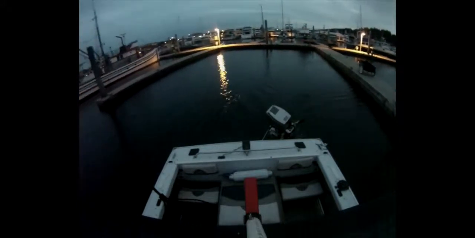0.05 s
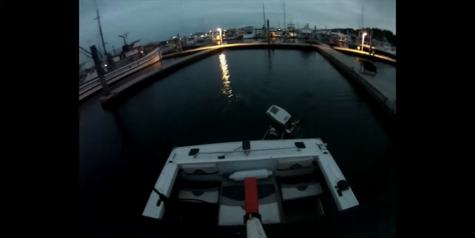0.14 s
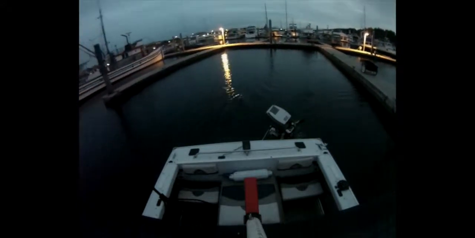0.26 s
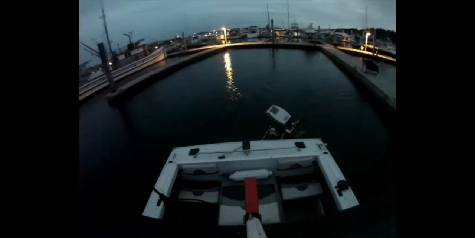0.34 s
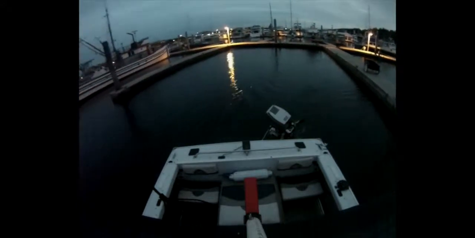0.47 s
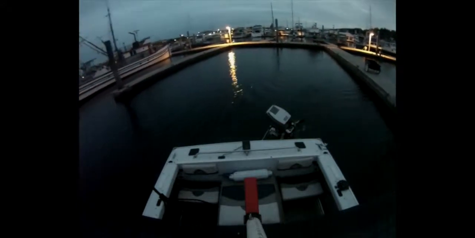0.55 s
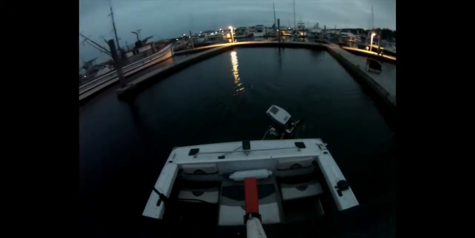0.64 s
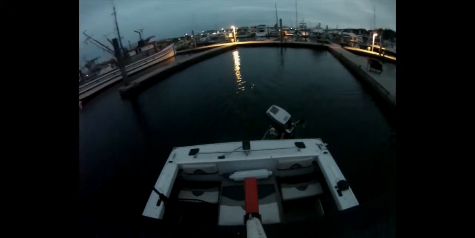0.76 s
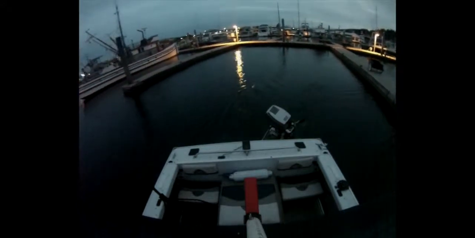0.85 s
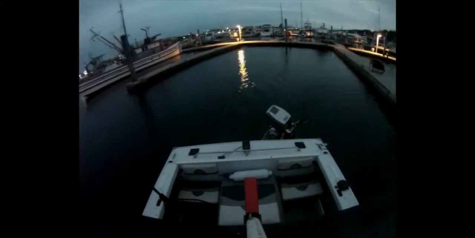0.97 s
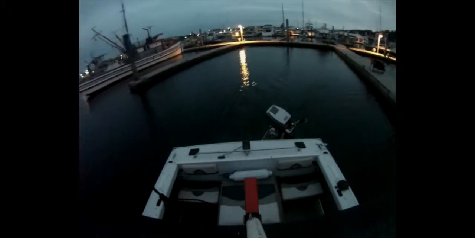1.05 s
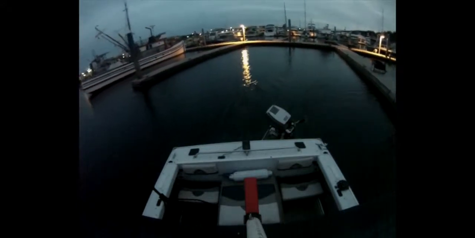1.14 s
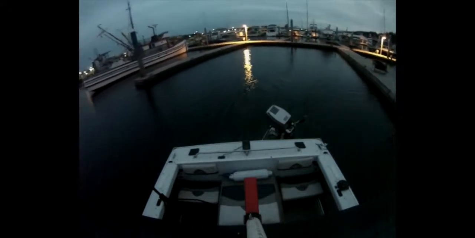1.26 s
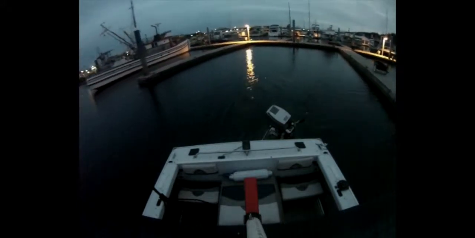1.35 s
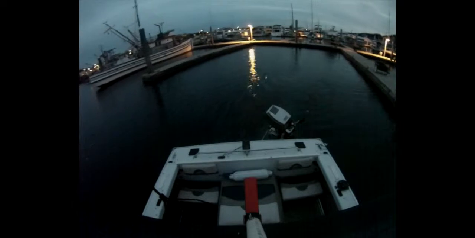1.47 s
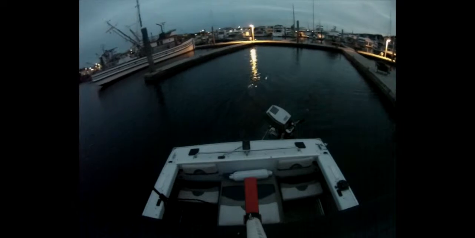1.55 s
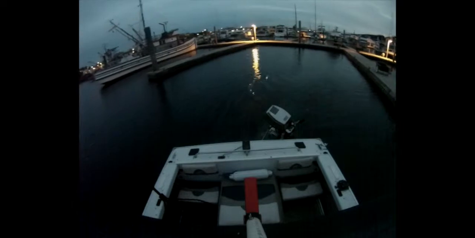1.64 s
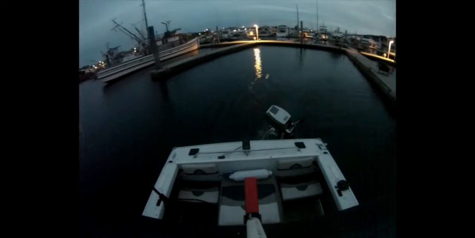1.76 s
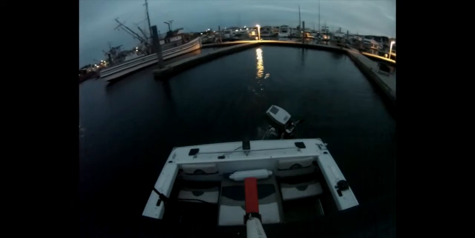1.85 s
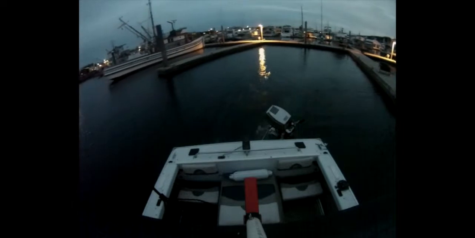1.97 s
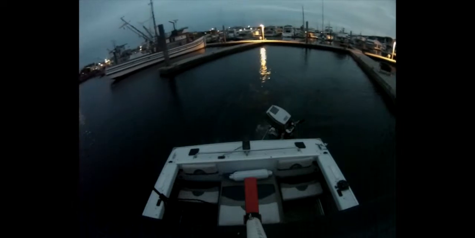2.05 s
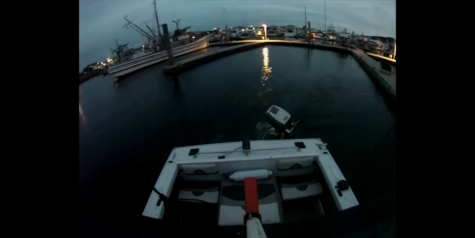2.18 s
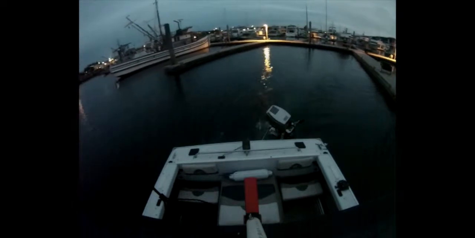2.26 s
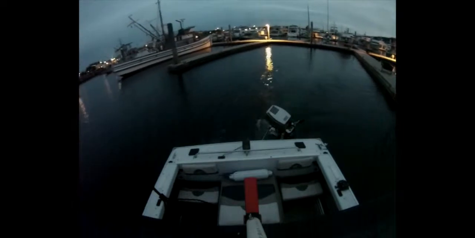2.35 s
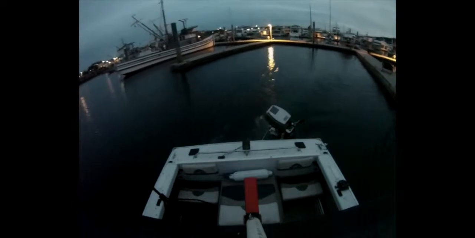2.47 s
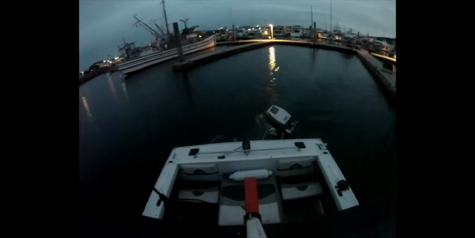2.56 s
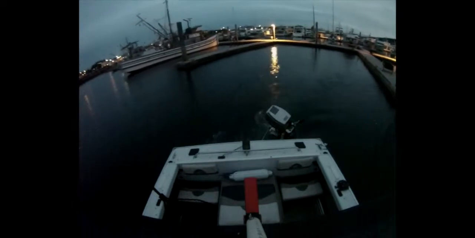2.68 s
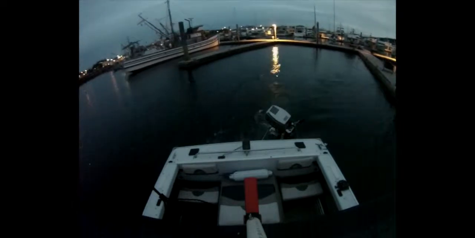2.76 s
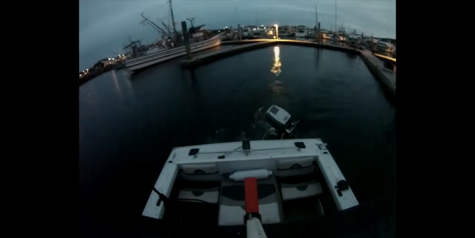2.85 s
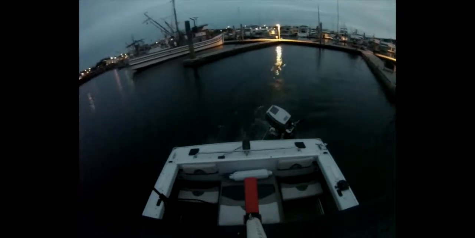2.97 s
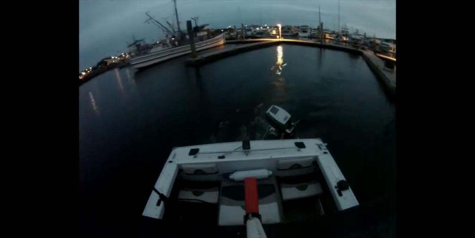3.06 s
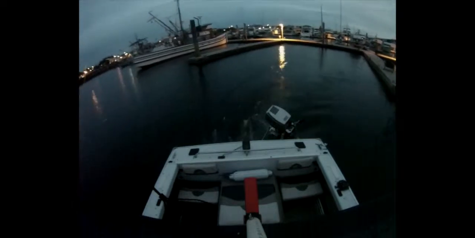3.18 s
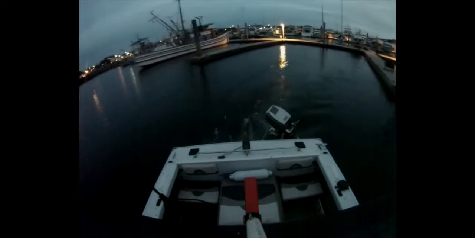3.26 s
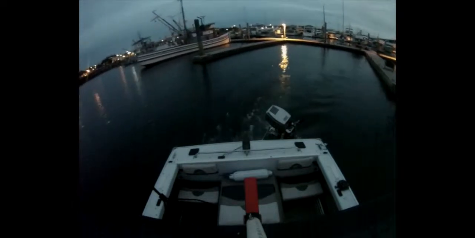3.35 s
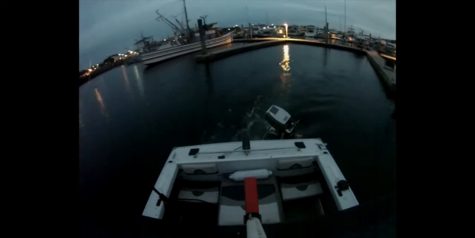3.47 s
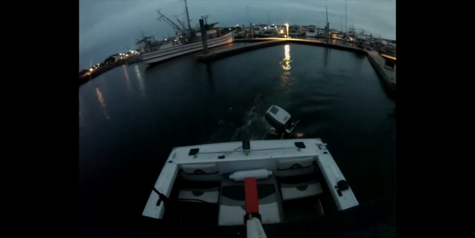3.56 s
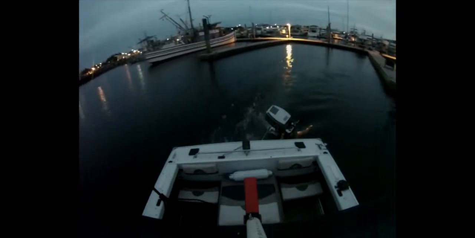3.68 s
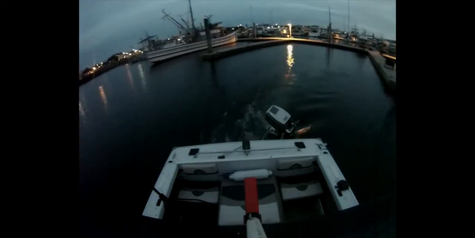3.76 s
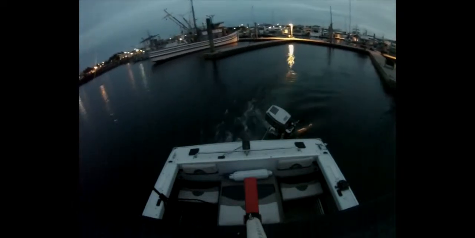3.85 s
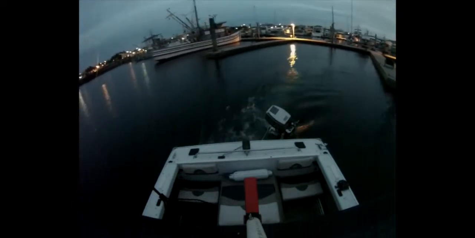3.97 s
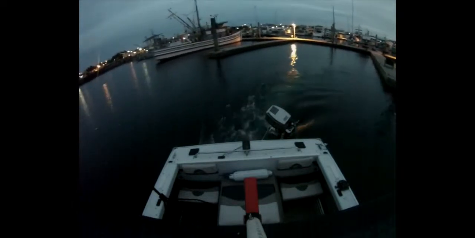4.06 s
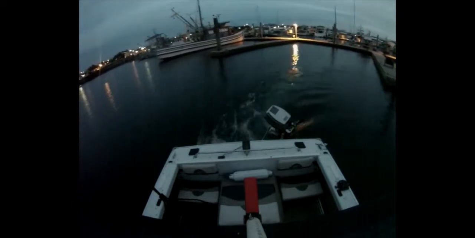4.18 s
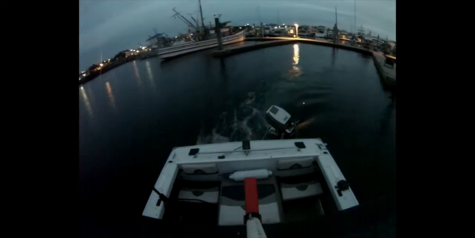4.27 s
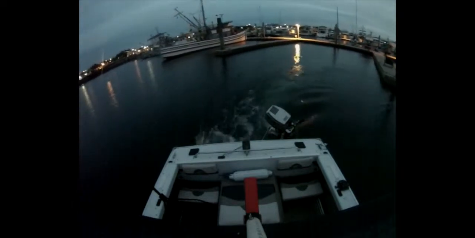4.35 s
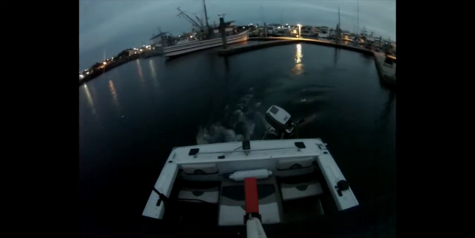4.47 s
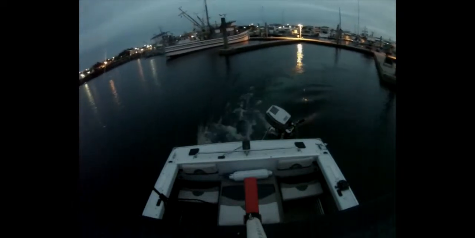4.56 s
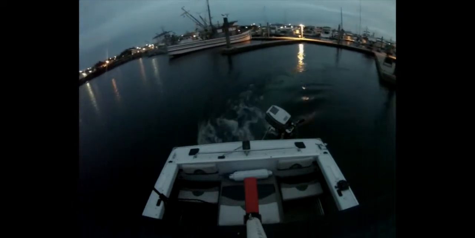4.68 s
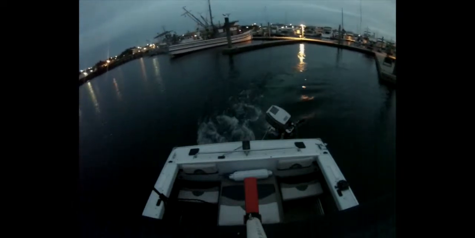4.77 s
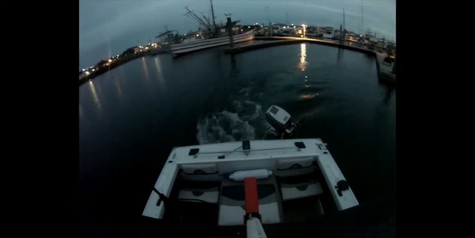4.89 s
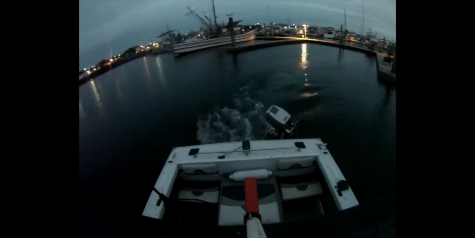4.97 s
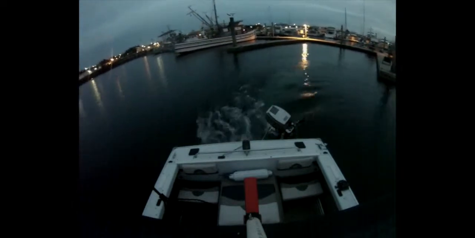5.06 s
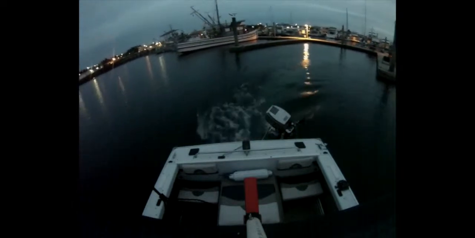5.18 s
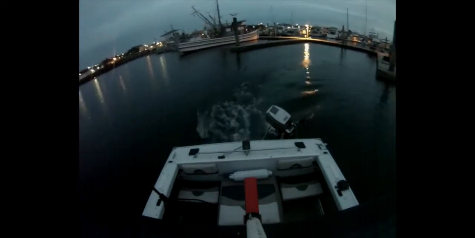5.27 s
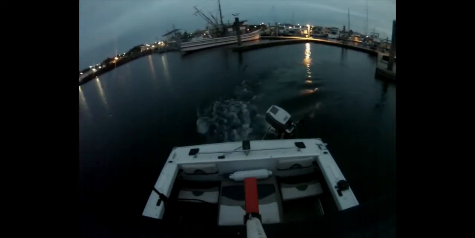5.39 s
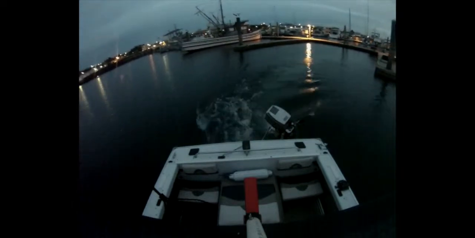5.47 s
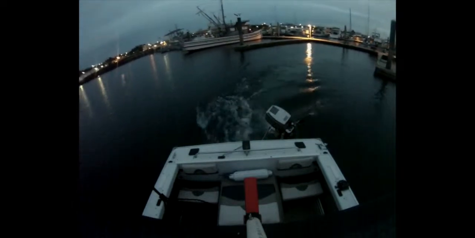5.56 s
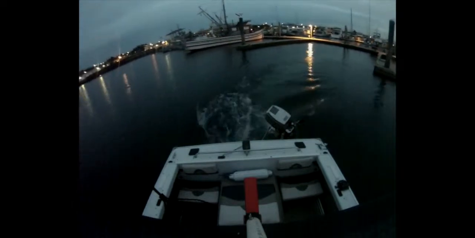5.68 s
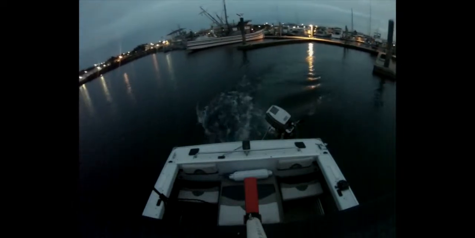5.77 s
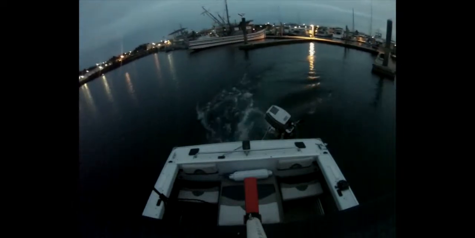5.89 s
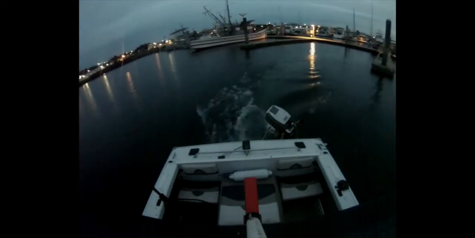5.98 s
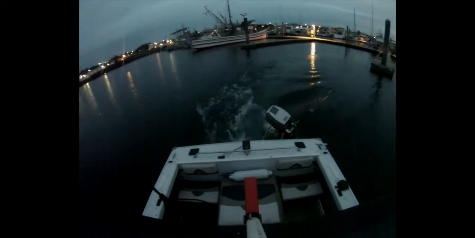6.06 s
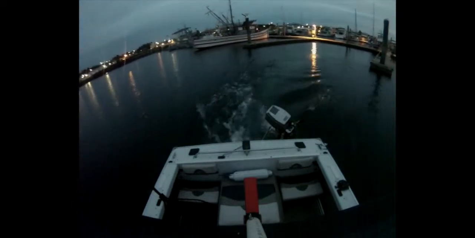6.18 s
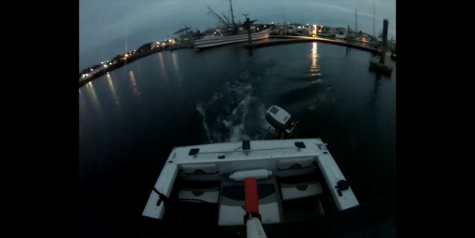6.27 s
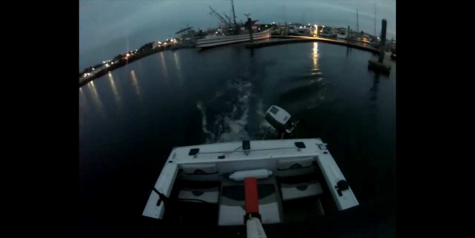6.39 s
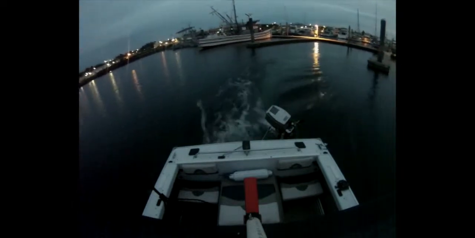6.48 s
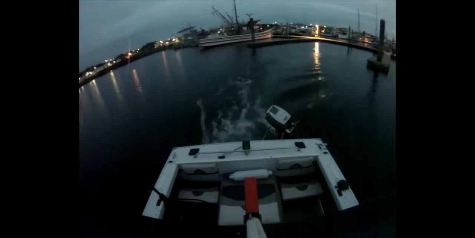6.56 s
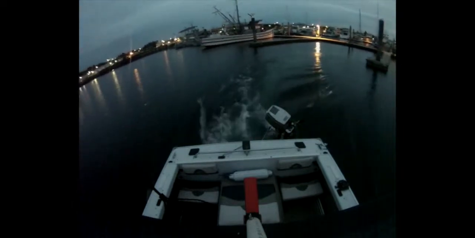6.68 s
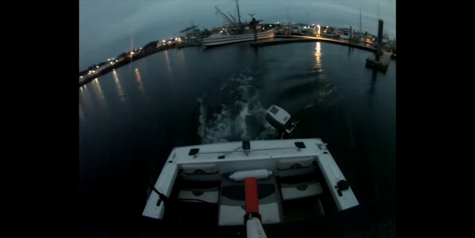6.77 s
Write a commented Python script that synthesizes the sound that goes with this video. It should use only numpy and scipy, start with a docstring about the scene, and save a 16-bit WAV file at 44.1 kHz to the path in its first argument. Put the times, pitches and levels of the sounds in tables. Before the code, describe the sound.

On board a small boat leaving a calm harbour, close to the stern motor: low burbling tick-over first, then a quick rise in revs with a brief stumble and bark, a throbbing low drone under a faint beating whine, and a second, gentler step up. Churning, bubbly water gradually replaces the engine's hiss, dotted with small drips and dry flecks of spray.

```python
"""A small outboard motor, heard from on board, ticks over and is then opened up in two steps, near 1.9 s and 4.6 s.
At tick-over the underwater exhaust drones, gulps and burbles while the engine hisses; the drone is summed sines.
As the throttle opens the drone stumbles, the gears' beating sines climb in whine and the cowl's noise clatters more.
As the boat gathers way, shaped noise and tiny rings make a fizzing wash, with splashes and flecks of spray."""
import sys
import numpy as np
from scipy import signal
from scipy.fft import rfft, irfft, next_fast_len
from scipy.io import wavfile
from scipy.ndimage import uniform_filter1d, map_coordinates

SR = 44100
rng = np.random.default_rng(int(sys.argv[2]) if len(sys.argv) > 2 else 0)


def wav_record(signal):
    """Record a signal, one row per channel, as 16-bit PCM in the file named by sys.argv[1]."""
    frames = np.transpose(np.atleast_2d(signal))
    bounded = np.clip(frames, -1, 1)
    # unit amplitude maps onto the largest positive 16-bit level
    quanta = np.round(bounded * 32767).astype(np.int16)
    wavfile.write(sys.argv[1], SR, quanta)


N = 301203

CAVITY_HZ = 80  # the exhaust cavity's own note

# Resonances of exhaust cavity and hull, met by the climbing low tones. Each row: frequency in Hz, level in dB.
HULL_RESONANCES = [(40, -31.5), (46, -28), (51.5, -21), (55.7, -17), (57.5, -20), (61, -33.5), (78, -18.5),
                   (82, -21.5), (90, -28), (104, -43.5), (110.5, -42), (113, -27.5), (122, -30), (155, -32),
                   (163, -31.5), (170, -34.5)]


def amp(db):
    """Decibels to gain."""
    return 10 ** (np.asarray(db) / 20)


def unit(x):
    """Scaled to rms 1."""
    return x / np.sqrt(np.mean(x ** 2) + 1e-20)


def wobble(knots_per_s):
    """A smooth random curve through normally distributed knots."""
    knots = rng.standard_normal(int(N * knots_per_s / SR) + 4)
    return map_coordinates(knots, [np.arange(N) * knots_per_s / SR])


def along(points, hz):
    """(Hz, value) points read on a log frequency axis."""
    f, v = np.transpose(points)
    return np.interp(np.log(hz), np.log(f), v)


def swells(rows):
    """Decibels over time: one smooth hump or dip a row of (s, half length s, dB)."""
    t = np.arange(N) / SR
    return sum(db * np.exp(-((t - s) / half_s) ** 2) for s, half_s, db in rows)


def filtered(x, response):
    """x times a response of frequency."""
    m = next_fast_len(N + SR // 2)
    return irfft(rfft(x, m) * response(np.fft.rfftfreq(m, 1 / SR)), m)[:N]


def coloured(x, spectrum):
    """x shaped by (Hz, dB per Hz) points, at rms 1."""
    f, db = np.transpose(spectrum)

    def gain(hz):
        return amp(np.interp(np.log(hz + 1), np.log(f + 1), db, left=-120, right=-120))
    return unit(filtered(x, gain))


def puffs(phase, depth):
    """White noise that swells once a firing."""
    return rng.standard_normal(N) * (1 + depth * np.cos(phase))


def engine_rate():
    """Firings a second: the speed creeps upward and follows each twist of the throttle with a lag."""
    # Twists of the throttle. Each row: start in seconds, firings a second gained, engine's lag in seconds.
    throttle_twists = [(1.89, 10.43, .251), (4.636, 3.4, .288)]
    idle_hz, creep_hz_per_s = 40.06, .454
    twist_s = .18  # the hand takes a moment to turn the grip
    t = np.arange(N) / SR
    gained_hz = sum(hz * (1 - np.exp(-np.maximum(t - s, 0) / lag_s)) for s, hz, lag_s in throttle_twists)
    return idle_hz + creep_hz_per_s * t + uniform_filter1d(gained_hz, int(twist_s * SR))


def exhaust(phase, rate, load, octave_level_db, unsteady_db):
    """Each firing sounds under water as a tone and its octave; bubbles unsettle the drone most at tick-over."""
    # The octave drops out briefly, mostly at tick-over. Each row: centre and half length in seconds, level in dB.
    dropouts = [(0, .08, -14), (.31, .03, -6), (.44, .07, -6), (.69, .045, -18), (.93, .08, -8.5),
                (1.14, .03, -6), (1.47, .04, -8), (2.03, .065, -3)]
    # The firing tone stumbles and catches as the throttle opens, then eases.
    # Each row: centre and half length in seconds, level in dB.
    stumbles = [(2.01, 0.031, -5), (2.08, 0.025, 5), (2.16, 0.083, -3), (3.45, .35, -0.95)]
    settle_db, settle_s = 4.5, .33  # the firing tone starts stronger and settles
    settling = settle_db * np.exp(-np.arange(N) / SR / settle_s)
    slack = 1 - load

    tone_db = along(HULL_RESONANCES, rate) + settling + swells(stumbles)
    tone_db = tone_db + (.4 + unsteady_db * slack) * wobble(22)
    tone = amp(tone_db) * np.sin(phase + .03 * wobble(15))

    octave_db = along(HULL_RESONANCES, 2 * rate) + octave_level_db + swells(dropouts)
    octave_db = octave_db + (.5 + .7 * slack) * wobble(16)
    lag_rad = np.clip(.7 * (2 * rate - CAVITY_HZ), 0, 4.4)  # grows as the octave crosses the cavity's note
    octave = amp(octave_db) * np.sin(2 * phase - lag_rad + (.06 + .18 * slack) * wobble(12))
    return -np.sqrt(2) * (tone + octave)


def boom(phase, rate, load, low_db, high_db, flutter_db, ragged_db):
    """The cavity booms at 1.5 times the firing rate; the octave of that is more ragged and trails under load."""
    # The exhaust cavity booms or falls quiet. Each row: centre and half length in seconds, level in dB.
    boom_swells = [(2.53, .13, 8), (2.89, .12, 7), (3.78, .08, -7), (3.97, .09, 9), (4.17, .13, 9.5),
                   (4.48, .08, 5)]
    # The drone's third harmonic throbs. Each row: centre and half length in seconds, level in dB.
    throbs = [(2.82, .05, 11), (3.14, .045, 8.5), (3.63, .06, 6), (3.83, .05, 11), (4.15, .15, 4.5)]
    low_db = along(HULL_RESONANCES, 1.5 * rate) + low_db + swells(boom_swells) + flutter_db * wobble(12)
    low = amp(low_db) * np.sin(1.5 * phase + .3 * wobble(6.8))

    high_db = along(HULL_RESONANCES, 3 * rate) + high_db + 2.5 * (1 - load) + swells(throbs)
    high_db = high_db + ragged_db * wobble(14)
    lag_rad = 1.2 + 4 * load
    high = amp(high_db) * np.sin(3 * phase - lag_rad + .3 * wobble(12))
    return -np.sqrt(2) * (low + high)


def barks():
    """A surge of gas rings the exhaust cavity at its own note."""
    # Surges, mostly as the throttle opens. Each row: centre and half length in seconds, level in dB.
    surges = [(2.1, .04, -33), (2.235, .04, -25.5), (5.96, .05, -30)]
    t = np.arange(N) / SR
    size = sum(amp(db) * np.exp(-((t - s) / half_s) ** 2) for s, half_s, db in surges)
    return np.sqrt(2) * size * np.sin(2 * np.pi * CAVITY_HZ * t + .2 * wobble(12))


def overtones(phase, load, level_db, flutter_db):
    """Firings that differ in a pattern of four, and moving parts, add a lope and faint lines around the drone."""
    # Weaker tones. Each row: multiple of the firing rate, level in dB at tick-over, level in dB under way.
    faint_tones = [(.25, -53, -55), (.5, -60, -45), (.75, -51, -43), (1.25, -52, -43), (1.75, -66, -50),
                   (2.25, -60, -56), (2.75, -60, -56), (4, -65, -69), (5, -76, -69), (6, -69, -78),
                   (7, -78, -73), (10, -80, -65), (11, -78, -71), (11.7, -78, -65), (12, -78, -67),
                   (14.5, -82, -67)]
    lines = np.zeros(N)
    for multiple, slow_db, fast_db in faint_tones:
        line_db = slow_db + load * (fast_db - slow_db) + flutter_db * wobble(7.6)
        start_rad = rng.uniform(0, 2 * np.pi)
        lines += amp(line_db) * np.cos(multiple * phase + start_rad + .55 * wobble(4.8))
    return np.sqrt(2) * amp(level_db) * lines


def burble(phase, load, pull, way, idle_db, running_db, pull_db, way_db):
    """Exhaust bubbles up stroke by stroke; it flares as the engine pulls and is left astern with way."""
    # Larger gulps of gas at tick-over. Each row: centre and half length in seconds, level in dB.
    gulps = [(.18, .02, 5), (.62, .06, 3), (.86, .025, 7), (1.06, .04, 7), (1.53, .02, 5), (2.015, .02, 5)]
    # Burble at tick-over. Each row: frequency in Hz, level in dB per Hz.
    idle_spectrum = [(10, -32.5), (28, -10.5), (45, -1.5), (58, 0), (69, -5.5), (80, -3.5), (98, -11),
                     (135, -7), (158, -10), (178, -22.5), (205, -20), (245, -14.5), (290, -23.5),
                     (350, -29), (500, -60)]
    # Burble under way. Each row: frequency in Hz, level in dB per Hz.
    running_spectrum = [(10, -28), (28, -12), (45, -2), (62, -3.5), (70, -3.5), (79, 1.5), (88, -6),
                        (102, -14.5), (125, -16.5), (150, -13), (182, -24), (240, -18.5), (275, -18.5),
                        (350, -31.5), (500, -61)]
    idle = amp(idle_db + swells(gulps)) * coloured(puffs(phase, depth=.8), idle_spectrum)
    running = amp(running_db) * coloured(puffs(phase, depth=.6), running_spectrum)
    mix = np.sqrt(1 - load) * idle + np.sqrt(load) * running
    return amp(pull_db * pull + way_db * way) * mix


def gears(phase, rate, pull, level_db, pull_db, flutter_db, jitter_rad):
    """Meshing teeth whine, loudest at resonances of the case; shaft play makes the high tones tremble most."""
    # Gear tones, the two close ones beating. Each row: multiple of the firing rate, relative level in dB.
    gear_orders = [(5.42, 0), (10.71, 1), (10.85, 1), (16.26, .5), (17.26, -11)]
    # Resonances of the gear case. Each row: frequency in Hz, level in dB.
    case_resonances = [(218, -55.5), (262, -42.5), (275, -41), (283, -47), (305, -54), (435, -66),
                       (500, -70), (530, -59.5), (550, -65), (566, -60.5), (585, -66), (603, -53),
                       (620, -55), (660, -72.5), (750, -58), (810, -53.5), (850, -55), (895, -55.5),
                       (930, -62.5)]
    # The highest tones swell and sag. Each row: centre and half length in seconds, level in dB.
    whine_swells = [(2.1, .05, 2), (2.45, .1, 2), (2.7, .16, -2.5), (3.65, .2, -2), (4.0, .08, 3),
                    (4.38, .09, -6)]
    # The lowest tone swells and sags. Each row: centre and half length in seconds, level in dB.
    hum_swells = [(1.87, .1, -3), (2.25, .1, 1.5), (2.52, .1, -1.5), (3.42, .12, -3.5), (4.45, .25, 2)]
    shaft = phase + jitter_rad * wobble(18)
    tones = np.zeros(N)
    for multiple, db in gear_orders:
        tone_db = along(case_resonances, multiple * rate) + db + flutter_db * wobble(25)
        if multiple > 16:
            tone_db = tone_db + swells(whine_swells) + 2 * wobble(20)
        if multiple < 6:
            tone_db = tone_db + swells(hum_swells)
        tones += amp(tone_db) * np.cos(multiple * shaft)
    return np.sqrt(2) * amp(level_db + pull_db * pull + .72 * wobble(7)) * tones


def clatter(phase, load, pull, idle_db, load_db, pull_db):
    """Engine noise under the cowl grows with load and flares while the engine pulls up to speed."""
    # Noise through the cowl. Each row: frequency in Hz, level in dB per Hz.
    cowl_spectrum = [(200, -37), (300, -8.5), (370, -5.5), (450, 0.5), (490, -3.5), (540, 1.5), (620, 2),
                     (700, -2), (830, 3.5), (925, -0.5), (975, -22), (1200, -35)]
    effort_db = idle_db + load_db * load + pull_db * pull
    return amp(effort_db + .65 * wobble(16)) * coloured(puffs(phase, depth=.046), cowl_spectrum)


def boat_way(load):
    """The boat's speed, 0 to 1, trails the engine's load."""
    lag_s = 3.44  # far slower than the engine
    step = 1 / (lag_s * SR)
    return signal.lfilter([step], [1, step - 1], load)


def bubbles(per_second, pitch_hz, cycles, spread_db):
    """A cloud of tiny bursting bubbles, each a short ring that decays over a number of cycles."""
    count = int(per_second * N / SR)
    t = np.arange(512) / SR
    hz = np.clip(pitch_hz * np.exp(.557 * rng.standard_normal((count, 1))), 900, 13000)
    size = amp(spread_db * np.minimum(rng.exponential(size=(count, 1)), 4))
    rings = size * np.sin(2 * np.pi * hz * t) * np.exp(-hz * t / cycles)
    at = rng.integers(0, N, (count, 1)) + np.arange(len(t))
    return unit(np.bincount(at.ravel(), rings.ravel(), N)[:N])


def wash(phase, load, way, base_db, load_db, way_db, fizz_db):
    """The hiss of the running engine gives way to churned, fizzing water."""
    # Engine hiss. Each row: frequency in Hz, level in dB per Hz.
    hiss_spectrum = [(560, -23), (950, -11), (983, -3.5), (1420, -5.5), (1890, -8.5), (2470, -8.5),
                     (3100, -13), (5440, -17), (8730, -22.5), (10400, -25.5), (14000, -32.5)]
    # Churned water. Each row: frequency in Hz, level in dB per Hz.
    water_spectrum = [(600, -41), (950, -7.5), (1350, -9.5), (1700, -13), (2270, -7), (2530, -8.5),
                      (2700, -20), (2980, -10.5), (3400, -20), (4600, -19), (5500, -20), (6200, -25),
                      (6800, -17), (7600, -26.5), (9300, -27.5), (10100, -31.5), (10900, -28.5),
                      (12100, -30), (13500, -55)]
    # The wake churns up or eases. Each row: centre and half length in seconds, level in dB.
    churns = [(3.0, .34, -.5), (3.9, .37, 0.7), (5.9, .1, 1.3), (6.5, 0.37, 0.5)]
    machine = coloured(puffs(phase, depth=.025), hiss_spectrum)
    fizz = bubbles(per_second=900, pitch_hz=5500, cycles=3.7, spread_db=1.5)
    foam = rng.standard_normal(N) + amp(fizz_db) * fizz
    drops = amp(-19) * bubbles(per_second=110, pitch_hz=2600, cycles=6, spread_db=2)
    water = coloured((foam + drops) * amp(.62 * wobble(16) + .9 * wobble(90)), water_spectrum)
    mix = amp(3.0) * np.sqrt(1 - load) * machine + amp(2.0) * np.sqrt(load) * water
    return amp(base_db + load_db * load + way_db * way + swells(churns)) * mix


def splashes(spray):
    """Each larger drop rings briefly, rising in pitch, in a soft puff of spray."""
    # Drips and slaps in the wake.
    # Each row: start in seconds, level in dB at the crest, starting pitch in Hz, 60 dB decay in seconds.
    drips = [(.234, -65.5, 2550, .12), (2.029, -61, 2400, .04), (2.069, -62, 2200, .05),
             (2.44, -61, 2550, .09), (3.117, -61, 2350, .05), (3.915, -62, 2200, .05),
             (4.121, -62, 1200, .04), (4.542, -62, 2300, .04), (4.577, -58, 2150, .07),
             (5.115, -60, 2200, .06), (5.396, -60, 2200, .06), (5.805, -58, 2300, .07),
             (5.912, -63.5, 4400, .08), (5.965, -55.5, 2300, .12), (6.045, -63, 4000, .05),
             (6.271, -58, 1200, .05), (6.315, -62.5, 3000, .07), (6.448, -58, 2200, .05)]
    out, t = np.zeros(N + SR), np.arange(SR // 10) / SR
    for s, db, hz, t60_s in drips:
        band = signal.butter(2, [hz * .85, hz * 1.18], "band", fs=SR, output="sos")
        mist = unit(signal.sosfilt(band, rng.standard_normal(len(t))))
        drop = unit(np.sin(2 * np.pi * hz * t * (1 + 2 * t)) + spray * mist)
        shape = amp(-60 * t / t60_s) * (1 - np.exp(-t / .004))
        out[round(s * SR):][:len(t)] += amp(db) * shape / shape.max() * drop
    return out[:N]


def flecks(t60_s):
    """Each fleck of spray lands with one short, bright, dry tick of noise."""
    # Flecks of spray. Each row: start in seconds, level in dB at the crest.
    ticks = [(3.72, -63), (4.013, -60.5), (4.588, -62), (5.238, -60), (5.806, -61), (5.872, -60.5),
             (5.908, -59), (6.277, -62)]
    t = np.arange(N) / SR
    size = sum(amp(db - 60 * np.abs(t - s) / t60_s) * (t >= s) for s, db in ticks)
    bright = [(2000, -15), (3600, 0), (7000, -4), (12000, -12), (13500, -35)]  # Hz, dB per Hz
    return size * coloured(rng.standard_normal(N), bright)


def scene():
    """One engine speed drives every part of the motor; the wash follows load and the boat's speed."""
    rate = engine_rate()
    phase = 2 * np.pi * np.cumsum(rate) / SR
    # the drone falls behind as it climbs into the hull's resonance
    hull_band_hz, hull_lag_cycles = (44.5, 49), .85
    hull_phase = phase - 2 * np.pi * np.interp(rate, hull_band_hz, [0, hull_lag_cycles])
    load = np.clip((rate - 41) / 14, 0, 1)  # 0 at tick-over, 1 under way
    acceleration = np.gradient(rate)
    pull = acceleration / acceleration.max()  # 1 at the hardest acceleration
    way = boat_way(load)

    drone = exhaust(hull_phase, rate, load, octave_level_db=-9.5, unsteady_db=1.0)
    drone += boom(hull_phase, rate, load, low_db=-21.0, high_db=-19.0, flutter_db=-.5, ragged_db=2)
    drone += barks()
    drone += overtones(phase, load, level_db=0, flutter_db=2.0)
    gas = burble(hull_phase, load, pull, way, idle_db=-43.3, running_db=-38.3, pull_db=3, way_db=-2)
    whine = gears(phase, rate, pull, level_db=-.3, pull_db=1, flutter_db=.7, jitter_rad=.014)
    cowl = clatter(phase, load, pull, idle_db=-57.0, load_db=3.0, pull_db=2.0)
    water = wash(phase, load, way, base_db=-66.5, load_db=2.5, way_db=6, fizz_db=-13.0)
    water += splashes(spray=.99) + flecks(t60_s=.024)
    return (drone + gas + whine + cowl + water)[None]


def record(dry):
    """Removes everything above the band limit."""
    top_hz = 15000
    return filtered(dry[0], lambda hz: hz < top_hz)[None]


dry = scene()
out = record(dry)
wav_record(out)
```